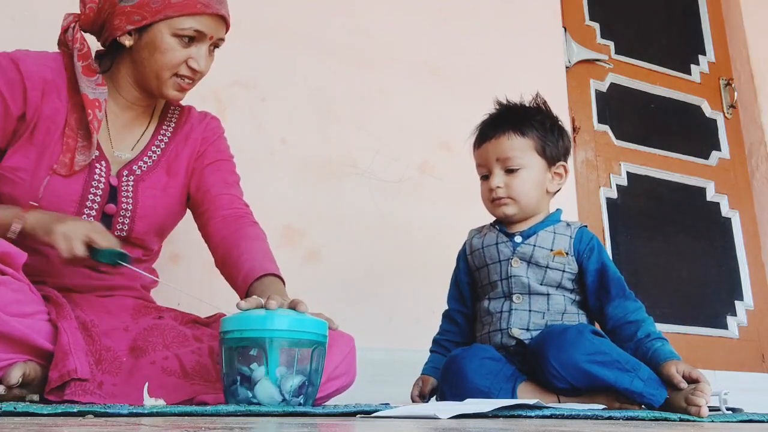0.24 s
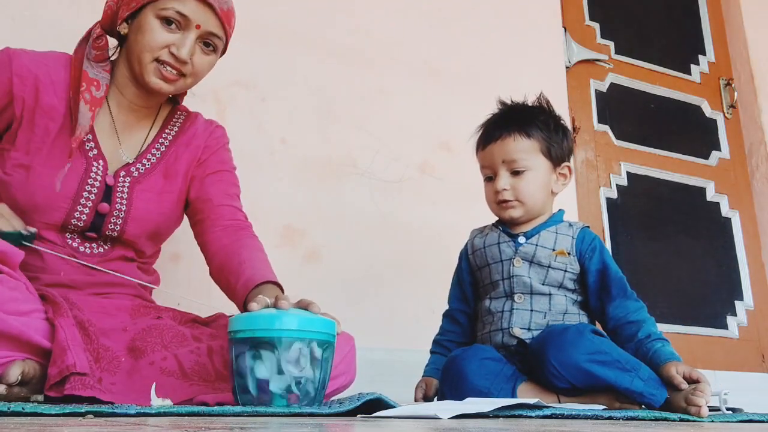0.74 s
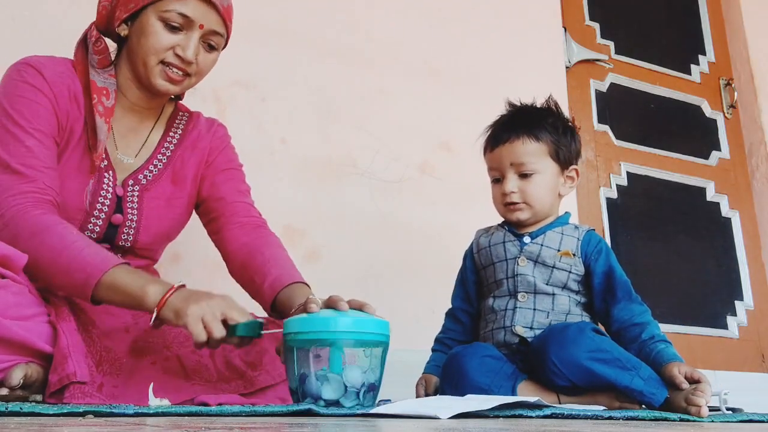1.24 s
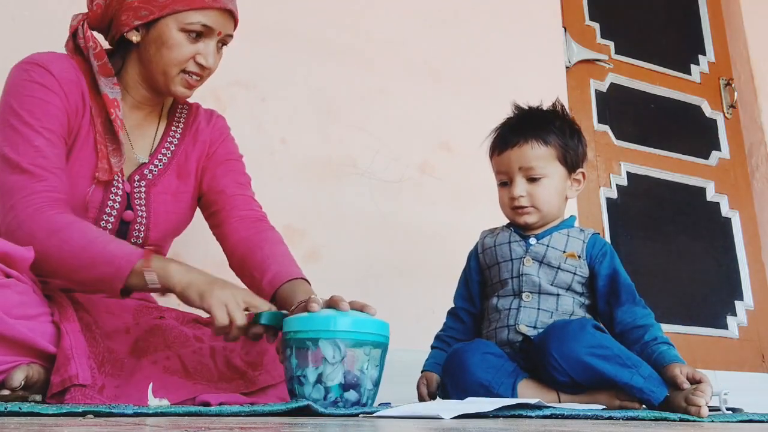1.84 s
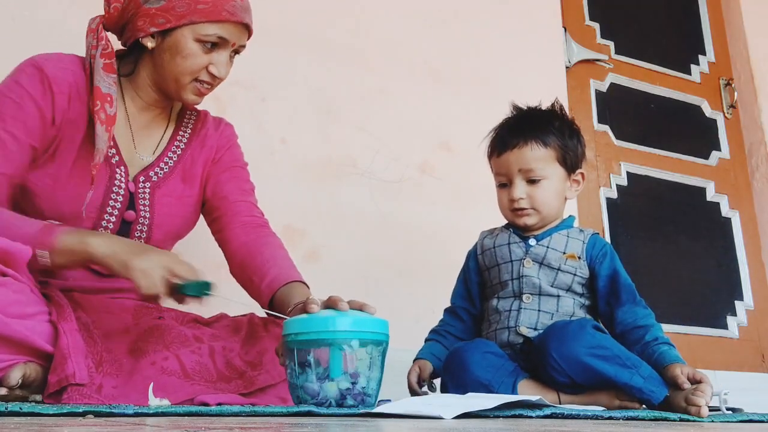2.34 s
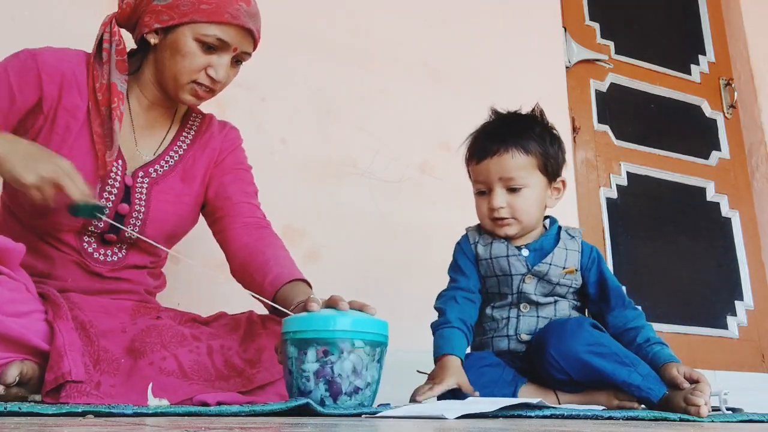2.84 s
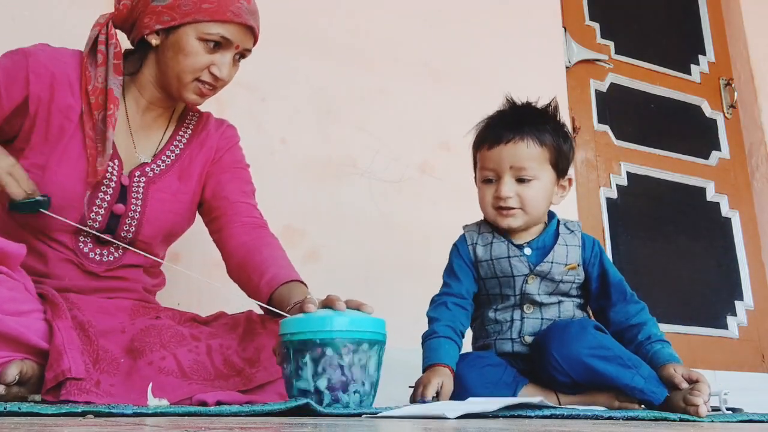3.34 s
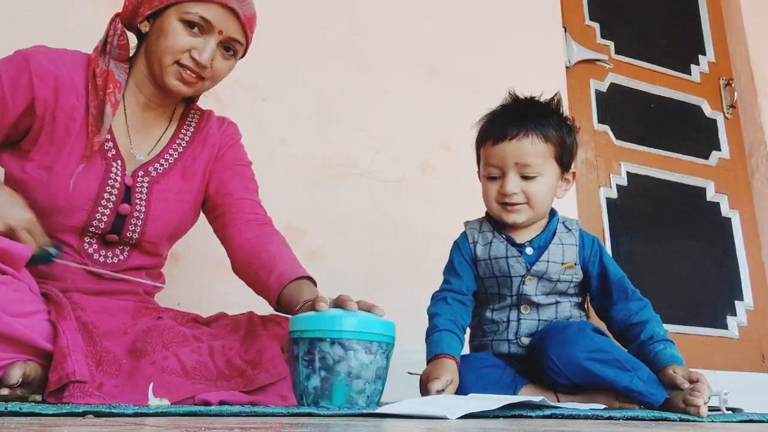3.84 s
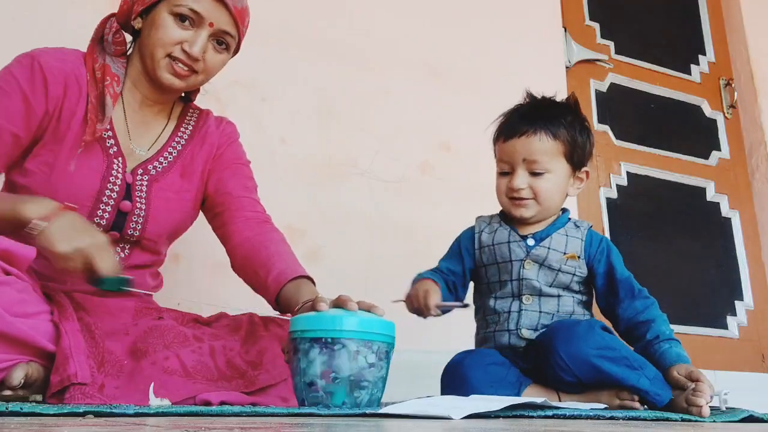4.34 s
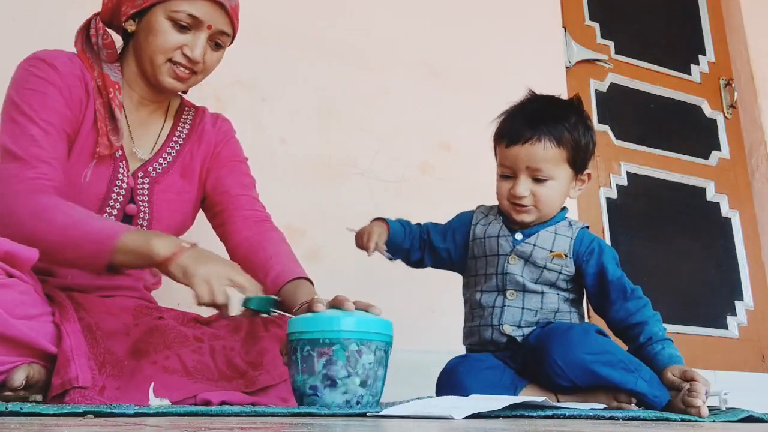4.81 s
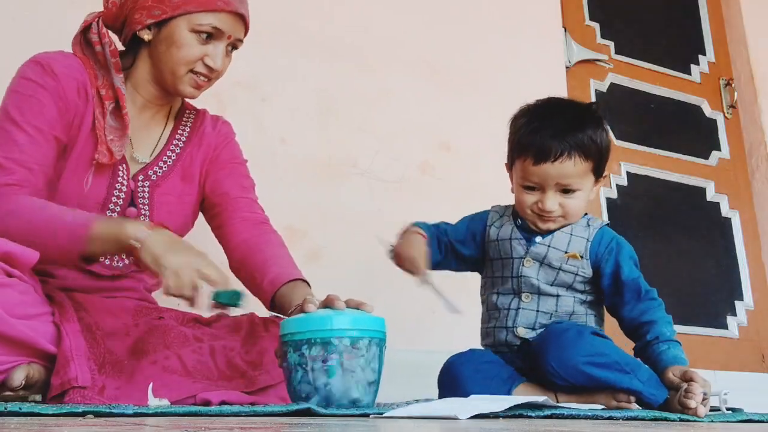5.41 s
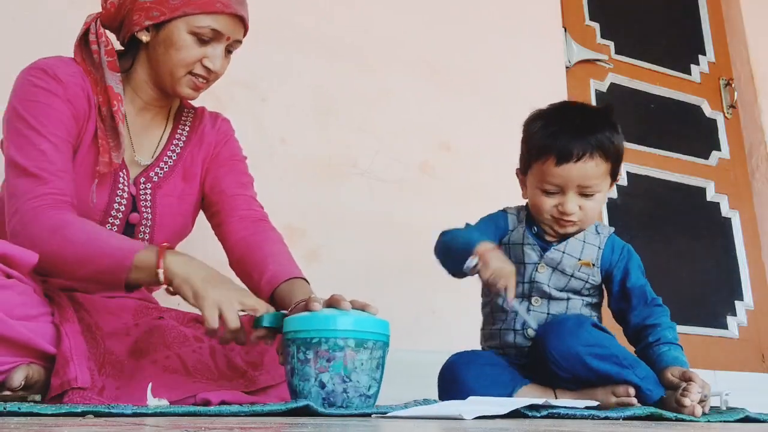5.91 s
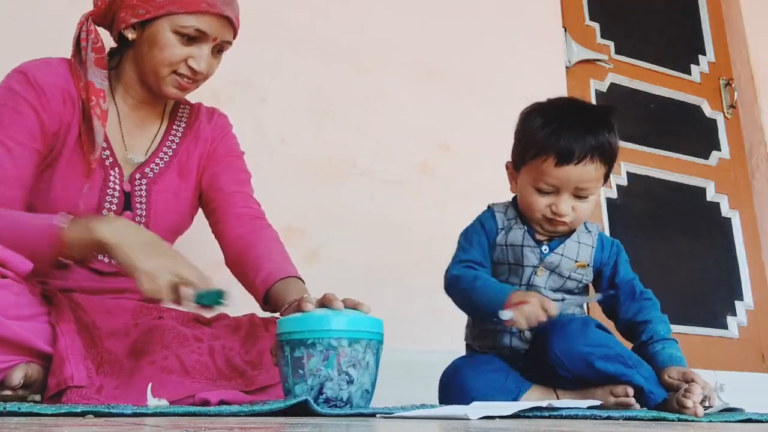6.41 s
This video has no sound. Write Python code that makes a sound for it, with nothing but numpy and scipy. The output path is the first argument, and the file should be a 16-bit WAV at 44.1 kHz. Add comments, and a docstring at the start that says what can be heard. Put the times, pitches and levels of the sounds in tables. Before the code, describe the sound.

A pull-cord hand chopper is yanked eleven times, blades crunching onion pieces around a plastic bowl, each pull answered by a rattling cord rewind.

```python
"""A pull-cord vegetable chopper is worked eleven times on a floor mat, close by, in a small dry room.
Each pull first clicks as the drive catches, then spins the blades, which cut onion and fling it round the
plastic bowl: random impacts, pulsed by the blade passes, excite resonances, with single cracks of hard chunks.
After each pull the pawl clacks free and a spring winds the cord back in: rasp and freewheel rattle ring the lid.
A short room reply and faint air noise lie beneath."""
import sys
import numpy as np
from scipy import signal
from scipy.fft import rfft, irfft, next_fast_len
from scipy.io import wavfile
from scipy.ndimage import map_coordinates

SR = 44100
rng = np.random.default_rng(int(sys.argv[2]) if len(sys.argv) > 2 else 0)


def unload_wav(signal):
    """Save mono or channel-first audio to the path in sys.argv[1] as 16-bit WAV at rate SR, clipped to [-1, 1]."""
    wavfile.write(
        sys.argv[1],
        SR,
        np.round(np.clip(np.atleast_2d(signal).T, -1, 1) * 32767).astype(np.int16),
    )


N = 293706
STOP_S = .012  # decay time of a stopped part

# Contact spectra of pieces knocking, swirling and being cut. Each row: frequency in Hz, relative level in dB.
KNOCK_COLOUR = [(30, -48.5), (50, -52), (85, -19), (160, -10.5), (270, -3.5), (480, 0.5), (660, -3),
                (950, -0.5), (1300, -11.5), (2500, -20), (6000, -49.5)]
SWIRL_COLOUR = [(300, -38.5), (800, -5.5), (1300, 0.5), (2000, -0.5), (2800, -2), (3400, -6.5), (4200, -17),
                (5200, -20.5), (8000, -52), (16000, -59)]
CRUNCH_COLOUR = [(500, -22.5), (2000, 0.5), (4200, 2), (5200, -8), (6000, -3), (6600, 1.5), (7500, 0.5),
                 (8000, -9), (10000, -15.5), (13000, -23.5), (16000, -31)]
# Resonances of the filled bowl. Each row: frequency in Hz, width in Hz, lift in dB before the ring factor.
BOWL_MODES = [(174, 31, 5.5), (281, 55, 3.5), (360, 47, 1), (480, 115, 3.5), (723, 19, 3.5), (828, 31, 5),
              (950, 250, 3), (1353, 110, 5.5), (1486, 35, 5.5), (1757, 55, 4), (1816, 100, 1),
              (2060, 32, 4), (2220, 110, 4), (2585, 110, 1.5)]


def chopping():
    """Amplitude modulation: blade passes, faster in a strong pull, pulse the impacts that ring the bowl."""
    knock, swirl, crunch = pull_gains()
    pace = (swirl / swirl.max()) ** .15
    passes = beats(100 * pace, jitter=.2, life=.003, spread_db=2, between=.3)
    snaps = beats(170 * pace, jitter=.4, life=.003, spread_db=5, between=.25)
    throws = knock * unit(contacts(2200, spread_db=1.5) * passes ** 0.32)
    scatter = swirl * unit(contacts(3200, spread_db=2) * passes ** 0.19)
    cutting = crunch * unit(contacts(7000, spread_db=6.0) * passes ** 0.27 * snaps ** 0.38)
    chunks = struck(throws, KNOCK_COLOUR, BOWL_MODES, ring=1.03, tint_db=2.3)
    bits = struck(scatter, SWIRL_COLOUR, BOWL_MODES, ring=1.18, tint_db=2.5)
    cuts = struck(cutting, CRUNCH_COLOUR, BOWL_MODES, ring=.6, tint_db=2.5)
    return amp(-0.48) * chunks + amp(-0.26) * bits + amp(3.0) * cuts


COAST_SHARE, PULL_SWELL, PULL_BRAKE = .056, 1.5, 2.3  # speed share at the stop; steepness of rise and fall
LABOUR_SHARE, BREAK_S = .75, .006  # share of speed while labouring in the pile; time to break through
KNOCK_GROWS, SWIRL_GROWS, CRUNCH_GROWS = 1.52, 1.85, 1.46  # gain as a power of blade speed
COAST_LOSS_DB = 17.5  # coasting blades cut less: loss of crunch by the stop
JOLT_LEAD_S, JOLT_S = .004, .125  # slack cord stirs the drive before the catch; the pieces then settle
JOLT_SWIRL_DB, JOLT_CRUNCH_DB = -4.5, -17  # relative to the knocking of the jolt

# Pulls of the cord, before mixing trims. Each row: catch in seconds, blades break through in seconds,
# fastest in seconds, stop in seconds, knock level in dB, swirl in dB relative to it, crunch in dB relative
# to it, jolt of loose pieces in dB, clack of the catch in dB, its click in dB.
CORD_PULLS = [(0, .156, .186, .415, -27.5, 1, -15.5, -39, -39, -40),
              (0.638, .733, .812, 1.015, -20.7, 0, -18.5, -44, -33, -41),
              (1.43, 1.527, 1.615, 1.825, -27.5, -.5, -11, -55, -38, -49),
              (2.064, 2.175, 2.222, 2.404, -20.5, 0, -16, -39, -41, -33.5),
              (2.655, 2.753, 2.819, 2.993, -20.5, -1, -15, -39.5, -23.5, -30),
              (3.236, 3.362, 3.412, 3.553, -18, 1, -17.5, -39.5, -21, -51),
              (3.811, 3.897, 3.968, 4.124, -18, 0, -16.5, -38, -27, -30.5),
              (4.392, 4.47, 4.519, 4.689, -20.5, -1, -14.5, -35.5, -15, -52),
              (4.954, 5.044, 5.099, 5.243, -19.5, -1, -15.5, -39, -22.5, -30),
              (5.518, 5.623, 5.688, 5.84, -20.5, -1, -16, -43, -22, -35),
              (6.092, 6.2, 6.261, 6.4, -20.5, -1, -16.5, -42.5, -27, -39.5)]


def pull_gains():
    """Power laws of speed: the catch jolts the pieces, then blades labour, break free and coast."""
    t, total = np.arange(N) / SR, np.zeros((3, N))
    for start, free, fastest, stop, db, swirl_db, crunch_db, jolt_db, *_ in CORD_PULLS:
        now = (t >= start - .05) & (t < stop + .1)
        s = t[now]
        load = np.interp(s, [free, free + BREAK_S], [LABOUR_SHARE, 1])
        speed = load * arch(s, start, fastest, stop, 0, COAST_SHARE, PULL_SWELL, PULL_BRAKE)
        coast = np.clip((s - fastest) / (stop - fastest), 0, 1)
        knock = speed ** KNOCK_GROWS
        swirl = amp(swirl_db) * speed ** SWIRL_GROWS
        crunch = amp(crunch_db - COAST_LOSS_DB * coast) * speed ** CRUNCH_GROWS
        spin = amp(db) * np.array([knock, swirl, crunch])
        shaken = np.exp(np.minimum((s - start) / JOLT_LEAD_S, (start - s) / JOLT_S))
        jolt = amp(jolt_db) * np.outer(amp([0, JOLT_SWIRL_DB, JOLT_CRUNCH_DB]), shaken)
        # unrelated sounds add in power
        total[:, now] += np.hypot(spin, jolt) * np.exp(-np.maximum(s - stop, 0) / STOP_S)
    return total


# Blades hitting hard chunks, before mixing trims. Each row: time in seconds, level in dB, crack in dB
# relative to it.
CHUNK_HITS = [(0.11, -13, -7), (.159, -8.5, -10.5), (0.17, -6.5, -10), (0.714, -12.5, -20.5),
              (.735, -5, -29.5), (.798, -5, -13), (.811, -2.5, -33.5), (1.529, -5.5, -20),
              (1.585, -17, -5.5), (1.645, -16, -8), (1.678, -9.5, -13), (2.112, -13, -22),
              (2.177, -13.5, -11.5), (2.2, -8, -12), (2.213, -9.5, -12), (2.255, -6, -34),
              (2.79, -8, -19.5), (2.819, -8, -25), (3.364, -4, -17), (3.381, -4, -13.5), (3.402, -2.5, -33),
              (3.416, -4, -36), (3.433, -10.5, -22.5), (3.887, -10.5, -30), (3.901, -7.5, -27),
              (3.915, -6.5, -17), (3.927, -5.5, -16), (3.95, -6, -23), (3.964, 0, -23), (4.483, -24, -31),
              (4.521, -19, -25), (4.589, -6, -37), (5.024, -5.5, -29), (5.058, -5, -27), (5.16, -3, -24.5),
              (5.627, -2.5, -23), (5.653, 0.5, -25), (6.204, -3, -24), (6.23, -11, -14),
              (6.307, -3.5, -21.5)]


def chunk_cracks():
    """Impulse response: a blade meeting a hard chunk sets the bowl ringing, with a brighter, shorter crack."""
    out = np.zeros(N)
    for s, db, crack_db in CHUNK_HITS:
        bowl = body(KNOCK_COLOUR, BOWL_MODES, ring=1.1, tint_db=2)
        bowl = bowl + amp(-2) * body(SWIRL_COLOUR, BOWL_MODES, ring=1.1, tint_db=2)
        crack = body(CRUNCH_COLOUR, BOWL_MODES, ring=.6, tint_db=2.5)
        add(out, s, amp(db - 4.5) * blow(bowl, life=0.0046, scatter=.12))
        add(out, s, amp(db + crack_db + 5.5) * blow(crack, life=0.0016, scatter=0.24))
    return out


# Contact spectra of freewheel and cord. Each row: frequency in Hz, relative level in dB.
RATTLE_COLOUR = [(30, -45), (60, -41), (110, -14), (250, -5), (330, -5), (420, -3), (650, -3), (930, 0.5),
                 (1200, -8), (1620, -12.5), (2100, -15.5), (2800, -13.5), (5000, -23), (12000, -35)]
RASP_COLOUR = [(600, -27.5), (2000, 0), (2900, 0), (3700, -4.5), (4400, -5), (5200, -13), (5900, -6.5),
               (6600, -0.5), (7450, -0.5), (7900, -13.5), (8400, -16), (10000, -18), (13000, -27),
               (16000, -37)]
# Resonances of the lid with its drive. Each row: frequency in Hz, width in Hz, lift in dB before the ring factor.
LID_MODES = [(263, 42, 3.1), (383.5, 13, 5.8), (508, 135, 5.6), (736, 84, 3), (923, 190, 3.1),
             (988, 25, 1.6), (1434, 80, 7.7), (1820, 92, 9.6), (2280, 100, 1.4), (2930, 480, 1.6),
             (4450, 130, 4.1), (6770, 150, 2), (7650, 200, 1.4), (8500, 100, 8)]


def rewinding():
    """Friction and ratchet noise: cord rubs its eyelet, freewheel teeth tick on the lid, pulsing each turn."""
    rattle, rasp = rewind_gains()
    pace = (rasp / rasp.max()) ** .15
    teeth = beats(230 * pace, jitter=.25, life=0.003, spread_db=1.0, between=0.48)
    turns = beats(88 * pace, jitter=0.16, life=0.0046, spread_db=-1.0, between=0.73)
    ticks = rattle * unit(contacts(2800, spread_db=2) * teeth ** 0.24 * turns ** 0.63)
    rubbing = rasp * unit(contacts(7000, spread_db=5.5) * teeth ** 0.37 * turns ** 0.21)
    chatter = struck(ticks, RATTLE_COLOUR, LID_MODES, ring=1.17, tint_db=2.5)
    cord = struck(rubbing, RASP_COLOUR, LID_MODES, ring=0.94, tint_db=1.5)
    return amp(-0.6) * chatter + amp(1.15) * cord


TAKE_UP_S = .031  # the spring takes up the cord
REEL_START_SHARE, REEL_END_SHARE = .55, .04  # share of speed at both ends
REEL_SWELL, REEL_BRAKE = 1.9, 3.6  # steepness of the speeding up and slowing
RATTLE_GROWS, RASP_GROWS = 1.24, 1.1  # gain as a power of reel speed

# Rewinds, before mixing trims. Each row: start in seconds, fastest in seconds, stop in seconds,
# rattle level in dB, rasp in dB relative to it, clack of the release in dB.
CORD_REWINDS = [(0.319, 0.477, 0.65, -33.5, -5, -32), (.992, 1.121, 1.272, -31, -3.5, -45),
                (1.783, 1.904, 2.08, -33, -2, -21), (2.369, 2.5, 2.706, -30.5, -4.5, -36),
                (2.974, 3.09, 3.245, -29, -4, -15.5), (3.545, 3.649, 3.818, -26.5, -4.5, -36),
                (4.105, 4.224, 4.375, -26, -4.5, -18), (4.678, 4.804, 4.949, -29.5, -3, -15.5),
                (5.245, 5.37, 5.5, -27.5, -4, -27), (5.828, 5.949, 6.08, -27.5, -4.5, -21.5),
                (6.407, 6.556, 6.67, -29, -4, -13.5)]


def rewind_gains():
    """Power laws of reel speed: quick take-up, a swell, then slowing as the hand nears the lid."""
    t, total = np.arange(N) / SR, np.zeros((2, N))
    for start, fastest, stop, db, rasp_db, _ in CORD_REWINDS:
        now = (t >= start) & (t < stop + .1)
        s = t[now]
        speed = arch(s, start, fastest, stop, REEL_START_SHARE, REEL_END_SHARE, REEL_SWELL, REEL_BRAKE)
        take_up = np.minimum((s - start) / TAKE_UP_S, 1) ** 2
        moving = take_up * np.exp(-np.maximum(s - stop, 0) / STOP_S)
        gains = np.array([speed ** RATTLE_GROWS, amp(rasp_db) * speed ** RASP_GROWS])
        total[:, now] += amp(db) * moving * gains
    return total


# Contact spectrum of the plastic drive. Each row: frequency in Hz, relative level in dB.
CLACK_COLOUR = [(50, -37), (120, -33.5), (260, -2), (600, -0.5), (980, 6.5), (1250, 1.5), (1600, -14.5),
                (2300, -6), (3000, -16.5), (5000, -30.5), (12000, -54)]


def drive_clacks():
    """Impulse response: each hit of the plastic drive rings the lid as a clack with a brighter click."""
    out = np.zeros(N)
    for s, db, click_db in drive_hits():
        lid = body(CLACK_COLOUR, LID_MODES, ring=1.1, tint_db=2)
        click = body(RASP_COLOUR, LID_MODES, ring=.8, tint_db=2)
        add(out, s, amp(db - 3) * blow(lid, life=0.0052, scatter=0.14))
        add(out, s, amp(db + click_db + 3) * blow(click, life=0.0065, scatter=0.68))
    return out


RELEASE_S, RELEASE_CLICK_DB = .025, -14  # pawl's delay after the hand turns back; click against clack, untrimmed

# The loose drive knocking on the lid, before mixing trims. Each row: time in seconds, level in dB,
# click in dB relative to it.
STRAY_KNOCKS = [(.648, -29, -10.5), (1.055, -22, -14), (1.34, -54, -2), (1.443, -31.5, -8),
                (3.653, -21, -24), (3.667, -14, -21), (3.824, -18.5, -34), (4.79, -13.5, -21),
                (5.004, -14.5, -20), (5.262, -31, -8.5), (5.463, -25.5, -8), (6.116, -17, -35),
                (6.535, -11, -18)]


def drive_hits():
    """Ratchet action: the pawl bites at each pull and lets go at each rewind; stray knocks fall between."""
    catches = [(start, db, click_db - db) for start, *_, db, click_db in CORD_PULLS]
    releases = [(start + RELEASE_S, db, RELEASE_CLICK_DB) for start, *_, db in CORD_REWINDS]
    return catches + releases + list(STRAY_KNOCKS)


# Reverberation of the room. Each row: frequency in Hz, time to fall by 60 dB in seconds.
ROOM_DECAY = [(100, 0.46), (600, 0.043), (3000, 0.16), (12000, 0.27)]


def room(x):
    """Reverberation: near wall and floor answer with decaying noise, longest in the bass, shortest near 600 Hz."""
    hz, t, z = signal.stft(rng.standard_normal(SR // 3), SR, nperseg=256)
    decay = amp(-60 * t / along(ROOM_DECAY, hz)[:, None])
    tail = signal.istft(z * decay, SR, nperseg=256)[1]
    return through(x, np.pad(tail / np.linalg.norm(tail), (SR // 300, 0)))


# Spectrum of the still air. Each row: frequency in Hz, relative level in dB.
AIR_COLOUR = [(25, -8.5), (90, 28), (300, 10), (600, 2), (1500, -1), (5000, 4), (16000, -26.5)]


def still_air():
    """Filtered noise: a faint steady hiss and rumble."""
    return amp(-76) * through(rng.standard_normal(N), body(AIR_COLOUR, [], ring=0, tint_db=0))


def arch(t, start, fastest, stop, first, last, swell, brake):
    """Kinematics of one arm stroke: speed swells from a share first to 1, then slows to a share last."""
    rise = np.sin(np.pi / 2 * np.clip((t - start) / (fastest - start), 0, 1)) ** swell
    fall = np.sin(np.pi / 2 * np.clip((stop - t) / (stop - fastest), 0, 1)) ** brake
    return np.abs((first + (1 - first) * rise) * (last + (1 - last) * fall))


def contacts(rate, spread_db):
    """Shot noise: random tiny impacts, rate a second, of scattered size and sign; rms 1."""
    size = amp(spread_db * np.clip(rng.standard_normal(N), -2, 2)) * rng.choice([-1, 1], N)
    return unit(size * (rng.random(N) < rate / SR))


def beats(rate, jitter, life, spread_db, between):
    """Periodic excitation: an envelope of rms 1 jumps at each pass and decays with time constant life."""
    at = np.flatnonzero(np.diff(np.floor(np.cumsum(rate) / SR)))
    late, size = np.clip(rng.standard_normal((len(at), 2)), -2, 2).T
    at = np.clip(at + jitter * late * SR / rate[at], 0, N - 1).astype(int)
    blows = np.bincount(at, amp(spread_db * size), N)
    decay = np.exp(-np.arange(SR // 20) / SR / life)
    return unit(unit(through(blows, decay)) + between)


def struck(force, colour, modes, ring, tint_db, count=13):
    """Position-dependent response: the contact point is redrawn 140 times a second, each with its own tint."""
    stay = SR // 140
    point = np.repeat(rng.integers(count, size=N // stay + 1), stay)[:N]
    return sum(through(force * (point == k), body(colour, modes, ring, tint_db)) for k in range(count))


def body(colour, modes, ring, tint_db, size=4096):
    """Modal resonance: a causal response of energy 1 from contact colour, resonances and a random tint."""
    hz = np.fft.rfftfreq(size, 1 / SR)
    resonances = sum(lift / (1 + (2 * (hz - f) / width) ** 2) for f, width, lift in modes)
    tint = map_coordinates(rng.standard_normal(size=64), [np.sqrt(hz / 9)])
    db = along(colour, hz) + ring * resonances + tint_db * tint
    # minimum phase: each contact starts sharply and rings on afterwards
    cepstrum = irfft(np.log(amp(db)))
    cepstrum[1:size // 2] *= 2
    cepstrum[size // 2 + 1:] = 0
    h = irfft(np.exp(rfft(cepstrum)))
    return h / np.linalg.norm(h)


def blow(response, life, scatter):
    """Impact excitation: a push and a short spray of smaller ones drive a response, at peak 1."""
    t = np.arange(SR // 20) / SR
    force = scatter * rng.standard_normal(len(t)) * np.exp(-t / life)
    force[0] = 1
    hit = signal.fftconvolve(force, response)
    return hit / np.abs(hit).max()


def through(x, h):
    """Linear filtering: x convolved with a response."""
    return signal.oaconvolve(x, h)[:N]


def add(track, s, sound):
    """Superposition: mix a sound in at s seconds."""
    part = track[max(round(s * SR), 0):][:len(sound)]
    part += sound[:len(part)]


def along(points, hz):
    """Logarithmic frequency scale: (Hz, value) points interpolated at hz."""
    f, v = np.transpose(points)
    return np.interp(np.log(hz + 1), np.log(f + 1), v)


def amp(db):
    """Level law: decibels to gain."""
    return 10 ** (np.asarray(db) / 20)


def unit(x):
    """Normalization: x at rms 1."""
    return x / np.sqrt(np.mean(x ** 2) + 1e-20)


def scene():
    """Superposition of the direct chopper, its room reply and the faint still air."""
    chopper = chopping() + chunk_cracks() + rewinding() + drive_clacks()
    return (amp(-1.0) * chopper + amp(-12.0) * room(chopper) + still_air())[None]


def record(dry):
    """Clipping and band limiting: peaks stop at full scale, then nothing from 15850 Hz up is kept."""
    m = next_fast_len(N + SR // 2)
    kept = np.fft.rfftfreq(m, 1 / SR) < 15850
    return irfft(rfft(np.clip(dry, -1, 1), m) * kept, m)[..., :N]


dry = scene()
out = record(dry)
unload_wav(out)
```